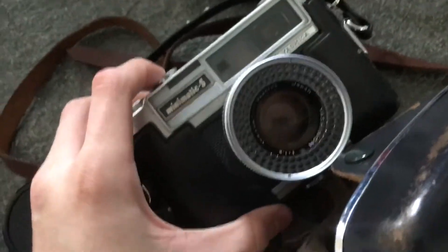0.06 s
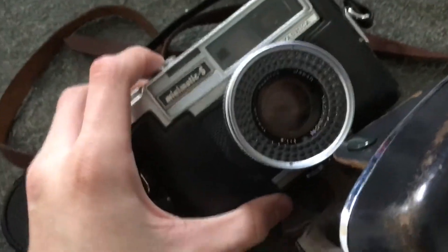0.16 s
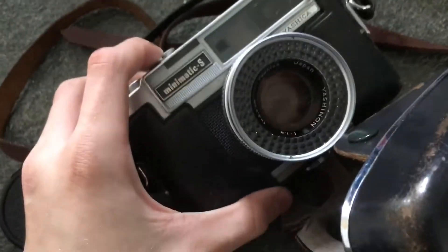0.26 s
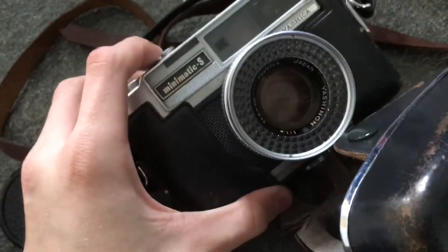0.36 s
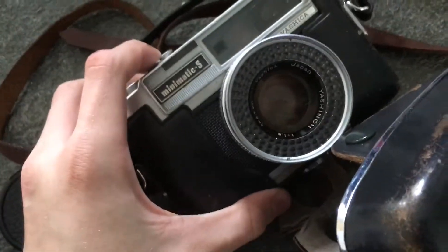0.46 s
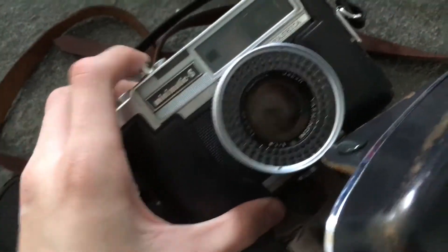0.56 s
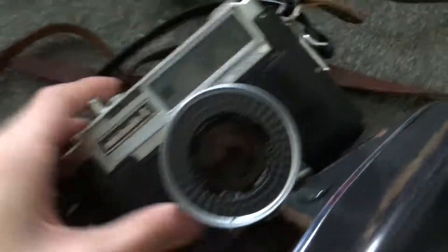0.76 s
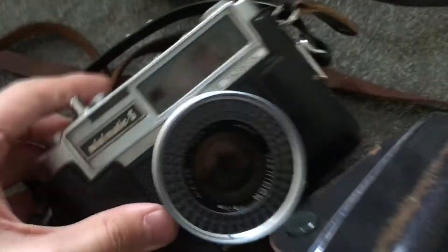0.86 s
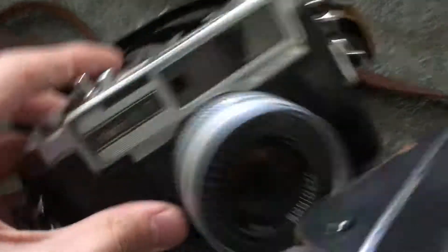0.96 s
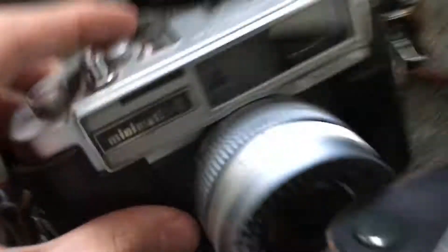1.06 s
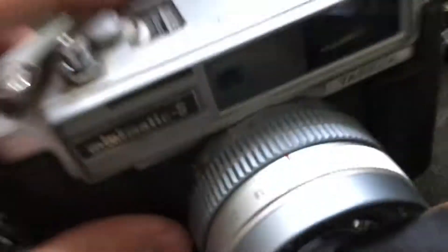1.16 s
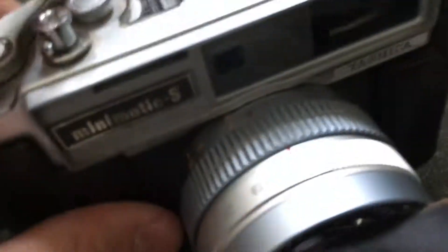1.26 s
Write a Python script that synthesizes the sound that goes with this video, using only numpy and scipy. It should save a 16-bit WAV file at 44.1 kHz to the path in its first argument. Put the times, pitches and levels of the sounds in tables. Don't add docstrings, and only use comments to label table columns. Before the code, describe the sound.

A camera shutter snaps sharply, then small ticks, knocks and soft rustling over low room hum.

```python
import sys
import numpy as np
from scipy import signal
from scipy.fft import rfft, irfft
from scipy.io import wavfile
from scipy.ndimage import uniform_filter1d

SR = 44100
rng = np.random.default_rng(int(sys.argv[2]) if len(sys.argv) > 2 else 0)


def to_linear_factor(level_db):
    exponent = np.asarray(level_db, float) / 20
    return 10 ** exponent


def unload_wav(signal):
    wavfile.write(
        sys.argv[1],
        SR,
        np.round(np.clip(np.atleast_2d(signal).T, -1, 1) * 32767).astype(np.int16),
    )


N = 57330


def evened(x):
    return x / np.sqrt(np.mean(x ** 2) + 1e-20)


def read(points, hz):
    point_hz, value = np.transpose(points)
    return np.interp(np.log(hz + 1), np.log(point_hz + 1), value)


def level_curve(points):
    time_s, level_db = np.transpose(points)
    return np.interp(np.arange(N) / SR, time_s, level_db)


def add(mix, start_s, sound):
    part = mix[round(start_s * SR):][:len(sound)]
    part += sound[:len(part)]


def resonate(x, hz, width_hz):
    pole = np.exp(-np.pi * width_hz / SR + 2j * np.pi * hz / SR)
    return 2 * signal.lfilter([1 - abs(pole)], [1, -pole], x + 0j).real


def highpass(order, hz):
    return signal.butter(order, hz, "high", fs=SR, output="sos")


def colour(x, points):
    gain = to_linear_factor(read(points, np.fft.rfftfreq(N, 1 / SR)))
    return evened(irfft(rfft(x) * gain, N))


def grains(rate_per_s, spread_db):
    clicks = (rng.random(N) < rate_per_s / SR) * rng.standard_normal(N)
    return clicks * to_linear_factor(spread_db * np.minimum(rng.exponential(1, N), 4))


def rattle(length_s, noise):
    first_touch = 3.27
    chatter = noise * np.exp(-np.arange(len(noise)) / SR / length_s)
    return np.append(first_touch, chatter) / np.sqrt(np.sum(chatter ** 2) / (length_s * SR / 2))


def ring(modes, stretch):
    t = np.arange(2000) / SR
    x = np.zeros(len(t))
    for k, ((hz, db, t60_s), ratio) in enumerate(zip(modes, stretch)):
        x += (-1) ** k * to_linear_factor(db - 60 * t / t60_s) * np.sin(2 * np.pi * hz * ratio * t)
    return x / np.linalg.norm(x)


def room_tone():
    # (frequency [Hz], width [Hz], level [dB])
    hum_modes = [(115.96, 12.1, -44), (86.2, 9.5, -62), (137.6, 2.5, -66.5), (103.2, 4.6, -68),
                 (50, 8.2, -66)]
    # (time [s], level [dB])
    swell = [(0.0, -55.5), (0.144, -45), (0.238, -57), (0.274, -40), (0.328, -70), (0.353, -44.5),
             (0.47, -53), (0.553, -39.5), (0.586, -72), (0.666, -51.5), (0.699, -55.5), (0.8, -47),
             (0.918, -52.5), (0.944, -43), (1.088, -47.5), (1.168, -40.5), (1.208, -52.5), (1.3, -40)]
    # (frequency [Hz], density [dB per Hz])
    floor_spectrum = [(12, -66), (20, -27.5), (32, -20.5), (121, 2), (156, -15.5), (297, -21.5), (382, -29),
                      (1240, -51), (16500, -75.5)]
    floor_db = -53.5
    hum = np.zeros(N + 2 * SR)
    for hz, width_hz, db in hum_modes:
        noise = rng.standard_normal(len(hum))
        hum += to_linear_factor(db) * evened(resonate(resonate(noise, hz, width_hz), hz, 2 * width_hz))
    envelope = uniform_filter1d(abs(signal.hilbert(hum)), 900)
    hum = hum / (envelope + 0.42 * hum.std())
    floor = colour(rng.standard_normal(N), floor_spectrum)
    return to_linear_factor(level_curve(swell) + 4) * hum[SR:SR + N] + to_linear_factor(floor_db) * floor


def room():
    # (frequency [Hz], t60 [s])
    decay = [(300, 0.54), (800, 0.56), (2000, 0.57), (5000, 0.43), (10000, .25), (15000, 0.18)]
    gap_s = 0.013
    hz, t, z = signal.stft(rng.standard_normal(SR // 2), SR, nperseg=128)
    z = z * to_linear_factor(-60 * t / read(decay, hz)[:, None])
    tail = signal.istft(z, SR, nperseg=128)[1]
    tail = tail * np.minimum(np.arange(len(tail)) / (gap_s * SR), 1)
    return tail / np.linalg.norm(tail)


def rustle():
    # (time [s], level [dB])
    handling = [(0, -69.5), (.13, -76), (.22, -70), (.3, -56), (.45, -61.5), (.57, -63), (0.629, -56.5),
                (0.702, -59), (0.748, -70.5), (.8, -63), (0.889, -66.5), (.94, -54.5), (1.04, -60.5),
                (1.09, -56.5), (1.3, -67)]
    # (frequency [Hz], density [dB per Hz])
    fibre_spectrum = [(300, -4.5), (650, -3), (1500, -2.5), (3000, -6.5), (8000, -13), (10300, -15.5),
                      (12000, -17), (16000, -23)]
    hiss = 0.7
    fibres = grains(5000, 2.0) + hiss * rng.standard_normal(N)
    return to_linear_factor(level_curve(handling) + 0.5) * colour(fibres, fibre_spectrum)


def rubs():
    stroke_starts = [.606, .612, .64, .81, .83, .82, .925, .955, .965, 1.0, 1.055, 1.06, 1.1, 1.18, 1.17,
                     1.285, .7]
    # (length [s], level [dB], frequency [Hz], width [Hz])
    leather = [(0.031, -54, 4140, 260), (0.0317, -51, 2100, 2800), (0.049, -61, 860, 1100),
               (0.03, -62, 10700, 4800), (0.034, -65, 7800, 5700), (0.083, -58.5, 640, 680),
               (0.02, -54, 1400, 2900), (0.075, -65.5, 5650, 460), (0.025, -50.5, 2940, 400),
               (0.12, -58, 150, 2300), (0.038, -59.5, 3000, 760), (0.23, -69.5, 9060, 890),
               (0.17, -92, 12400, 3300), (0.13, -65, 6400, 3200), (0.11, -84, 17000, 1200),
               (0.14, -54, 160, 560), (0.12, -64, 605, 170)]
    out = np.zeros(N)
    slips = grains(4600, 4.5) + 0.79 * rng.standard_normal(N)
    for start_s, (length_s, db, hz, width_hz) in zip(stroke_starts, leather):
        part = slips[round(start_s * SR):][:round(length_s * SR)]
        stroke = np.sin(np.pi * np.arange(len(part)) / (length_s * SR)) ** 0.57
        squeak = evened(resonate(resonate(part, hz, width_hz), hz, width_hz))
        add(out, start_s, to_linear_factor(db) * stroke * squeak)
    return out


def raised_plate_echo(soft):
    delay_samples, from_s, rise_s, full_share = 13, 1.07, 0.07, 0.85
    share = full_share * np.clip((np.arange(N) / SR - from_s) / rise_s, 0, 1)
    treble = signal.sosfiltfilt(highpass(3, 7800), soft)
    return -share * np.roll(treble, delay_samples)


def rings():
    # (time [s], peak [dB], frequency [Hz], width [Hz], rattle length [s])
    ringing_parts = [(0.1435, -38, 11570, 402, 0.00081), (0.143, -44.5, 7330, 300, 0.00063),
                     (.1435, -45.5, 5810, 250, 0.0018), (0.1428, -42, 8900, 350, 0.0007),
                     (.233, -23.5, 1417, 90, 0.0035), (0.239, -26.5, 712, 90, .002),
                     (.2395, -31.5, 863, 110, 0.0022), (0.243, -35, 1046, 97.6, .002),
                     (0.235, -34, 188, 80.1, 0.00096), (0.2383, -17.5, 12400, 250, 0.0022),
                     (0.6033, -47, 9040, 700, 0.0011), (.604, -49, 6200, 603, 0.0011),
                     (.605, -47, 3100, 500, .001), (.6283, -37, 6430, 650, 0.00084),
                     (0.6286, -48, 8000, 406, 0.00062), (.629, -44, 1120, 247.5, 0.0025),
                     (0.66, -42, 5600, 603, .001), (0.669, -48, 7430, 900, .002),
                     (0.67, -50, 2900, 600, 0.0038), (0.685, -54, 5500, 500, .001),
                     (.7035, -47, 614, 198, .003), (.703, -51, 3840, 400, .002),
                     (.705, -47, 1900, 600, .004), (0.8745, -42, 6540, 450, .0007),
                     (.8742, -46.5, 3360, 400, 0.0007), (.8742, -48.5, 4130, 400, .0006),
                     (.8745, -44, 2200, 250, .0008), (.918, -39.5, 8180, 300, 0.00062),
                     (0.9494, -41.5, 5500, 500, .0008), (0.95, -43, 9700, 900, .0007),
                     (0.958, -41, 9100, 800, 0.00077), (0.96, -51, 4300, 600, .001),
                     (1.0022, -39.5, 5400, 400, 0.0012), (1.0039, -38, 2000, 110, 0.0036),
                     (1.006, -41, 813, 121, .002), (1.0065, -37, 1120, 182, 0.0011),
                     (1.008, -40, 3280, 500, 0.0027), (0.998, -46, 1500, 600, 0.00086),
                     (1, -42, 3600, 700, .001), (1.034, -48, 1810, 900, 0.0011)]
    out = np.zeros(N)
    for start_s, db, hz, width_hz, length_s in ringing_parts:
        hit = rattle(length_s, rng.standard_normal(1500))
        tone = resonate(resonate(hit, hz, width_hz), hz, 4 * width_hz)
        add(out, start_s, to_linear_factor(db) * tone / abs(tone).max())
    return out


def ticks():
    # (time [s], knock [dB], knock [Hz], crack [dB], rattle length [s])
    handling_ticks = [(.1438, -44.5, 1730, -92, 0.0033), (.6015, -51, 8600, -46, 0.00041),
                      (.6035, -34, 13700, -40.5, 0.0006), (.6283, -36.5, 4230, -39, 0.00074),
                      (.631, -36, 1984, -44, 0.0015), (.6465, -62, 9520, -65, 0.0036),
                      (.655, -39, 2720, -61, 0.0034), (.673, -43.5, 11500, -48, 0.002),
                      (.683, -46, 2850, -81, 0.0023), (.7025, -45, 965, -44.5, 0.003),
                      (.7575, -45, 1950, -88, 0.0041), (.794, -73, 4370, -55.5, 0.0012),
                      (.8743, -35, 1340, -46, 0.00071), (.899, -60, 1510, -52, 0.0017),
                      (.9182, -33.5, 3430, -47, 0.0016), (.9186, -33, 1900, -66, 0.00034),
                      (.922, -39.5, 950, -70, 0.0029), (.9485, -57, 5500, -50, 0.00037),
                      (.9565, -43, 1840, -39.5, 0.0013),
                      (.983, -46, 5500, -70, 0.00087), (0.996, -48, 9000, -52, 0.00033),
                   (1.0019, -31.5, 3230, -70, 0.0012), (1.007, -43, 1290, -79, 0.0014),
                   (1.0102, -40, 2240, -52, 0.0013), (1.0119, -36.5, 1340, -77, 0.0019),
                   (1.01, -43.5, 547, -78, 0.0035), (1.031, -51, 6000, -41.5, 0.00073),
                   (1.055, -42, 3900, -73, 0.00044), (1.058, -41.5, 2500, -82, 0.0077),
                   (1.067, -45, 5330, -66, 0.0015), (1.089, -68, 2970, -41.5, 0.00062),
                   (1.097, -47.5, 5500, -72, 0.003), (1.116, -49, 1600, -66, 0.0021)]
    knock_q, overtone_ratio, overtone_db = 3.57, 2.04, -11.5
    crack_band = signal.butter(2, [2200, 9000], "band", fs=SR, output="sos")
    out = np.zeros(N)
    for start_s, knock_db, hz, crack_db, length_s in handling_ticks:
        hit = rattle(length_s, rng.standard_normal(1500))
        width_hz = hz / knock_q
        knock = resonate(resonate(hit, hz, width_hz), hz, 2 * width_hz)
        upper = resonate(hit, min(hz * overtone_ratio, SR / 2.8), 2 * width_hz)
        knock = knock / abs(knock).max() + to_linear_factor(overtone_db) * upper / abs(upper).max()
        crack = signal.sosfilt(crack_band, hit)
        crack = crack / abs(crack).max()
        add(out, start_s, to_linear_factor(knock_db + 1.5) * knock + to_linear_factor(crack_db + 2) * crack)
    return out


def shutter():
    # (time [s], peak [dB], rattle length [s], shell share [dB])
    light_strikes = [
        (0.1371, -44, 0.0014, -19.5),
        (0.1431, -39, 0.0019, -29),
        (0.146, -49, 0.0025, -22),
        (0.2087, -56.5, 0.0014, -13.5),
        (0.2148, -57.5, 0.00065, -22),
        (0.219, -59.5, 0.00091, -13),
        (0.2261, -58.5, 0.00071, -13),
        (0.25, -45, 0.0015, -20),
        (0.2863, -29, 0.0032, -2.5),
        (0.308, -32.5, 0.0015, -2),
    ]
    # (time [s], peak [dB], rattle length [s], shell share [dB])
    release = [
        (.2312, -29, .001, -8),
        (.233, -2, .0003, -12),
        (.2337, -11, .001, -6),
        (.2384, -8, .0002, -20),
        (.2388, -1.5, .0002, -16),
        (.2395, -11, .0007, -3),
        (.2412, -9.5, .001, -9),
        (.2428, -14, .001, -6),
        (.2442, -17, .0008, -6),
        (.2468, -27, .002, -3),
    ]
    # (frequency [Hz], level [dB], t60 [s])
    plate_modes = [(3220, -11.5, 0.0019), (4300, 0.5, 0.0025), (5500, -11.5, 0.017), (6310, -7, 0.0037),
                   (7055, 1, 0.0036), (8600, 6.5, 0.0015), (8970, -5.5, 0.0071), (11100, 1.5, 0.0015),
                   (13130, -9, 0.0065), (13700, 0.5, 0.00089), (16300, -27.5, 0.0026)]
    # (frequency [Hz], level [dB], t60 [s])
    shell_modes = [(697, -6.5, 0.02), (823, -1, 0.0093), (1045, -3, 0.024), (1368.5, 1, 0.034),
                   (1900, 10, 0.005), (2500, -20, .01), (207, -15, 0.022), (390, -12, .02),
                   (484, -6, 0.0055)]
    shell_db = -6.5
    out = np.zeros(N)
    for start_s, db, length_s, share_db in light_strikes + release:
        hit = rattle(length_s, rng.standard_normal(1200))
        plate_stretch = 1 + 0.034 * rng.standard_normal(len(plate_modes))
        shell_stretch = 1 + 0.013 * rng.standard_normal(len(shell_modes))
        plates = np.convolve(hit, ring(plate_modes, plate_stretch))
        shell = np.convolve(hit, ring(shell_modes, shell_stretch))
        strike = plates / abs(plates).max() + to_linear_factor(share_db + shell_db) * shell / abs(shell).max()
        add(out, start_s, to_linear_factor(db) * strike)
    return out


def scene():
    room_db = -20
    tone, tail = room_tone(), room()
    stroke = rubs()
    soft = rustle() + stroke
    soft = soft + raised_plate_echo(soft)
    near = signal.sosfilt(highpass(2, 170), shutter() + ticks() + rings())
    reverb = signal.fftconvolve(near + stroke, tail)[:N]
    return (near + soft + to_linear_factor(room_db) * reverb + tone)[None]


def band_limit(x):
    return signal.sosfilt(signal.butter(12, 17040, fs=SR, output="sos"), x)


def record(dry):
    edge_hz, shelf_db = 15850, -20
    low = signal.oaconvolve(dry, signal.firwin(255, edge_hz, fs=SR)[None], "same")
    mix = np.clip(low + to_linear_factor(shelf_db) * (dry - low), -1, 1)
    return band_limit(mix)


dry = scene()
out = record(dry)
unload_wav(out)
```